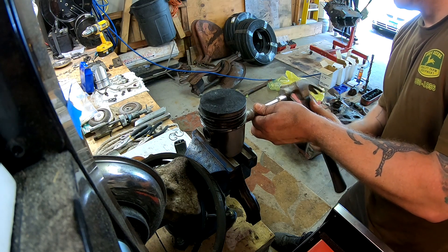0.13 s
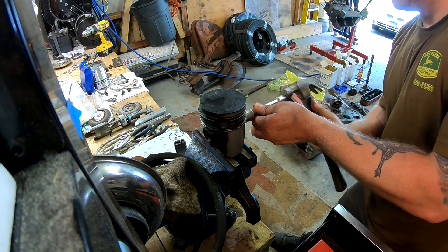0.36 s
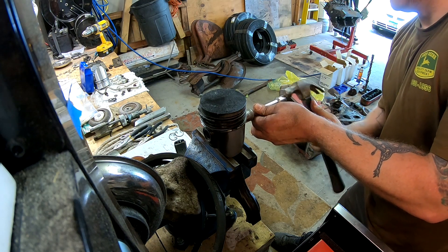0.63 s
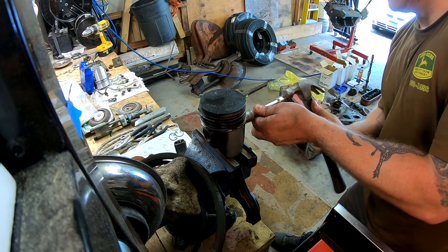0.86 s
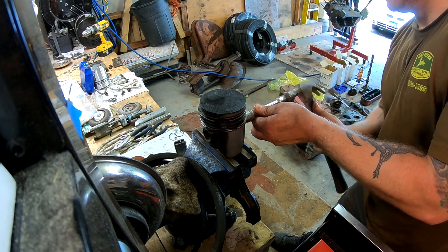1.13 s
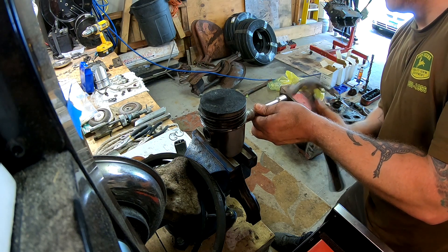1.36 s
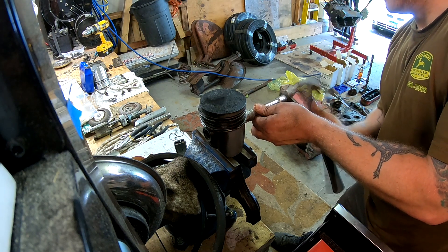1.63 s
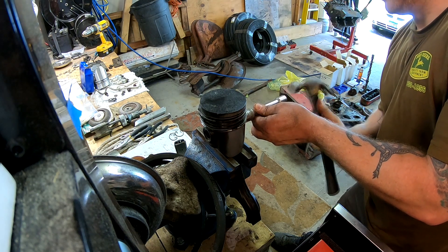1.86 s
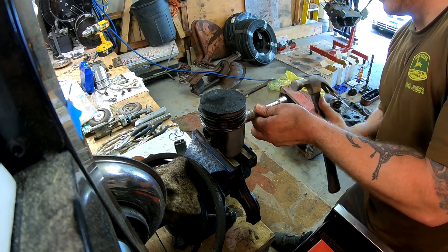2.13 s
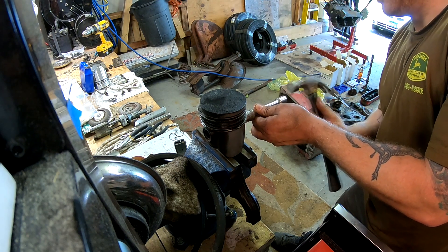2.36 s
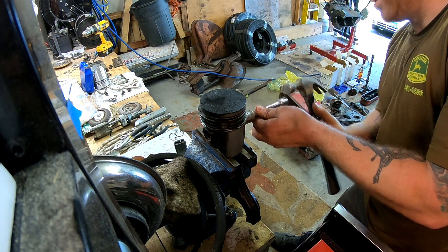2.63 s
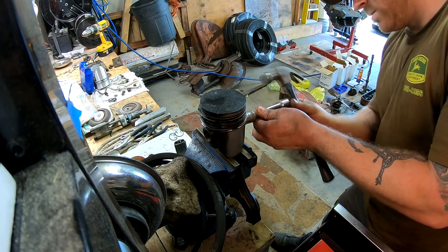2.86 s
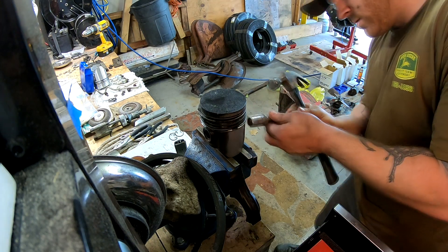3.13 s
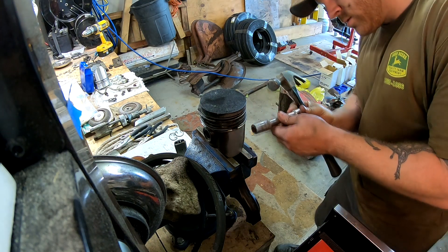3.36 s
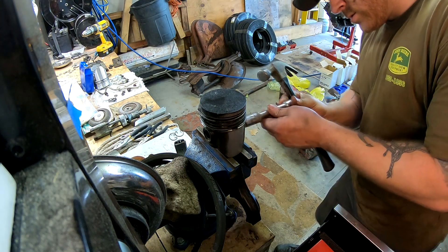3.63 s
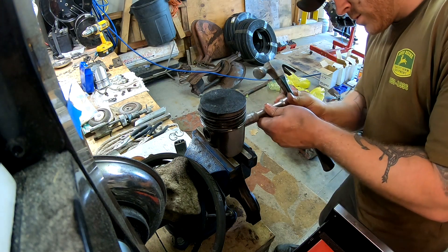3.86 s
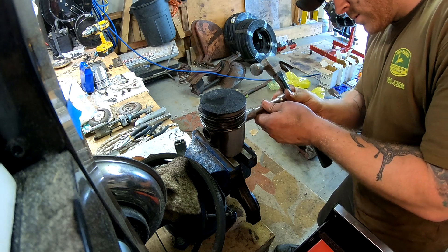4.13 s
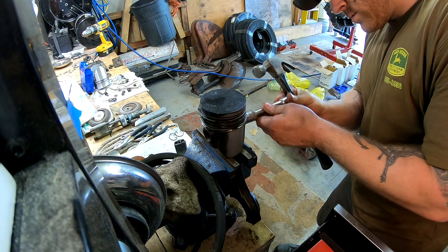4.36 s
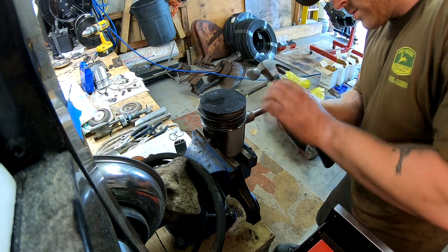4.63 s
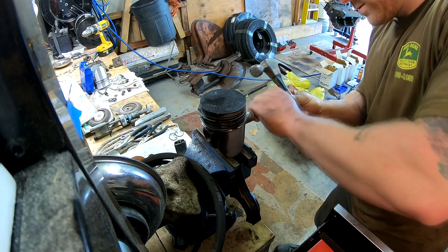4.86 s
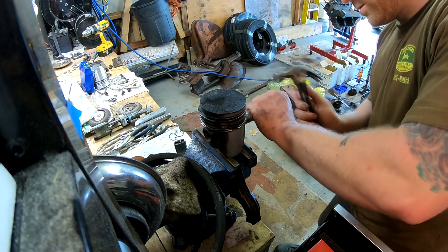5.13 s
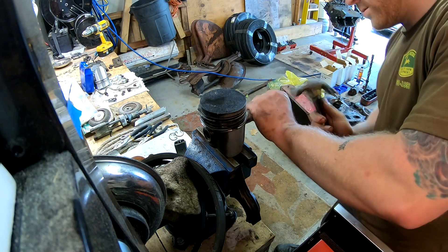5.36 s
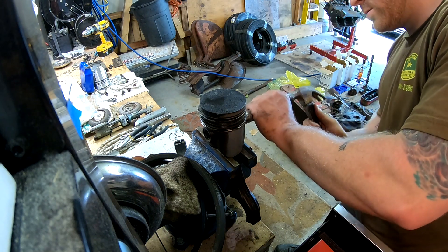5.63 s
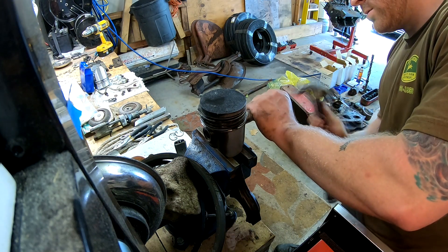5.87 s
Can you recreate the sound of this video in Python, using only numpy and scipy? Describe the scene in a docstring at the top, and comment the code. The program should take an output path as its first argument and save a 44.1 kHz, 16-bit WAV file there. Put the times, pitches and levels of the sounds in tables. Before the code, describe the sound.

Close in a cluttered workshop, a hammer strikes a steel socket against a pin held in a vise. Nine hard, even cracks come about four a second, each with a bench thud and short metallic rattle. Then hands shift the tools with faint ticks, hollow knocks and low bumps, before two final loud blows. A soft steady hiss stays underneath; the microphone is very near.

```python
"""A hammer taps a steel socket against a pin in a bench vise, heard close by in a cluttered workshop. A steady
noise hiss lasts throughout. One blow falls just before the start and nine more by 2.2 s: each is a jolt through
steel resonances, a modal thud of bench and loose metal, and a decaying noise wash from the shop. The tone soon
turns dull and narrow, while two bands flutter faintly ahead of the blows; from 2.6 to 4.4 s hands shift the
tools with ticks, hollow knocks and low bumps; the tone grows bright and wide again before two last blows at 5.5
and 5.9 s."""
import sys
import numpy as np
from scipy import signal
from scipy.fft import rfft, irfft, next_fast_len
from scipy.io import wavfile
from scipy.ndimage import map_coordinates

SR = 44100
rng = np.random.default_rng(int(sys.argv[2]) if len(sys.argv) > 2 else 0)


def gain_from_decibels(decibels):
    """Convert decibel values to linear amplitude factors."""
    exponent = np.asarray(decibels, float) / 20
    return 10 ** exponent


def to_wav(s):
    """Save 16-bit WAV."""
    ch = np.atleast_2d(s).T  # columns
    pcm = np.round(np.clip(ch, -1, 1) * 32767)  # PCM
    wavfile.write(sys.argv[1], SR, pcm.astype(np.int16))


N = 264600  # samples, 6 s


def unit(x):
    """Normalization: scales a signal to rms 1."""
    return x / np.sqrt(np.mean(x ** 2) + 1e-20)


def along(points, hz):
    """Spectral envelope: interpolates (frequency, value) points on a logarithmic frequency axis."""
    f, v = np.transpose(points)
    return np.interp(np.log(hz + 1), np.log(f + 1), v)


def curve(rows):
    """Time envelope: one value per sample for each column after the time."""
    s, *columns = np.transpose(rows)
    return [np.interp(np.arange(N) / SR, s, c) for c in columns]


def filtered(x, response):
    """Linear filtering: the spectrum of x is multiplied by a complex frequency response."""
    n = x.shape[-1]
    m = next_fast_len(n + 8192)
    return irfft(rfft(x, m) * response(np.fft.rfftfreq(m, 1 / SR)), m)[..., :n]


def add(track, s, sound):
    """Superposition: adds a sound to the track at s seconds, trimming what lies outside."""
    at = round(s * SR)
    part, sound = track[..., max(at, 0):], sound[..., max(-at, 0):]
    n = min(part.shape[-1], sound.shape[-1])
    part[..., :n] += sound[..., :n]


def ringing(modes, scatter_db, attack, lag=0):
    """Modal decay: damped sines of randomly scattered strength, each setting in after lag cycles."""
    hz, db, t60 = np.transpose(modes)[:, :, None]
    t = np.maximum(np.arange(SR // 2) / SR - lag / hz, 0)
    level_db = db + scatter_db * rng.standard_normal(hz.shape) - 60 * t / t60
    size = gain_from_decibels(level_db) * (1 - np.exp(-t / attack))
    return np.sum(size * np.sin(2 * np.pi * hz * t), axis=0)


# colour of the hiss: (frequency [Hz], relative level [dB])
HISS_COLOUR = [(15, -40), (25, -19), (117, -7), (175, 3), (285, -1.5), (439, 0), (659, -7), (754, -4.5),
               (1160, -8), (3520, -8), (6380, -11), (8590, -30), (12500, -41.5), (16000, -67.5)]
# left-right likeness of the hiss: (frequency [Hz], correlation [-1 to 1])
HISS_LIKENESS = [(60, 0.49), (150, 0.025), (380, 0.61), (950, -0.13), (2380, 0.65), (5980, 0.077),
                 (15000, -0.36)]


def hiss():
    """Stationary coloured noise: every blow sinks it a little and it creeps back; mid and side."""
    t = np.arange(N) / SR
    rest_db, sink_db, return_s = -54.5, 2, 1.27

    def response(hz):
        # the angle between mid and side sets the left-right correlation
        turn = np.arccos(np.clip(along(HISS_LIKENESS, hz), -1, 1)) / 2
        return gain_from_decibels(along(HISS_COLOUR, hz)) * [np.cos(turn), np.sin(turn)]

    noise = filtered(rng.standard_normal((2, N)), response)
    sunk_db = sink_db * sum((t > s) * np.exp(-(t - s) / return_s) for s, *_ in BLOWS)
    return gain_from_decibels(rest_db - sunk_db) * unit(noise)


# low bumps as the bench is leaned on: (time [s], level before the rise and decay [dB])
BUMPS = [(2.565, -50.5), (2.705, -50), (2.951, -49), (3.539, -55), (3.768, -46), (4.162, -51), (5.016, -71),
         (5.349, -60)]


def leaning():
    """Amplitude-modulated low noise: bumps through the bench over a faint unsteady rumble; mid and side."""
    t = np.arange(N) / SR
    rumble_db, swing_db, swings_per_s = -67, 2, 13
    rise_s, t60_s = 0.011, 0.43
    low = filtered(rng.standard_normal((2, N)), lambda hz: (hz / 60) ** 2 / (1 + (hz / 70) ** 5))
    unsteady = map_coordinates(rng.standard_normal(100), [t * swings_per_s])
    envelope = gain_from_decibels(rumble_db + swing_db * unsteady)
    for s, db in BUMPS:
        since = np.maximum(t - s, 0)
        envelope = envelope + gain_from_decibels(db - 60 * since / t60_s) * (1 - np.exp(-since / rise_s))
    return envelope * gain_from_decibels([[0], [-6]]) * unit(low)


# colour of the shop wash: (frequency [Hz], relative level [dB])
WASH_COLOUR = [(150, 5), (300, 2), (500, -4), (700, -1.5), (1000, -5.5), (1700, -3.5), (2400, -6),
               (3500, -3), (5200, -4.5), (6800, -6.5), (8200, -20.5), (10500, -30.5), (13500, -35.5),
               (16200, -69)]
# decay of the shop: (frequency [Hz], t60 [s])
SHOP_DECAY = [(150, 0.42), (400, 0.43), (900, 0.37), (1800, 0.37), (3000, 0.29), (5000, 0.32), (7500, 0.3),
              (14000, 0.25)]
# width of the shop wash: (frequency [Hz], side against mid [dB])
WASH_SPREAD = [(60, -42), (150, -16.5), (380, -13.5), (950, -4), (2380, -4.5), (5980, 0.5), (15000, 3)]


def wash(treble_db, hold):
    """Diffuse noise wash: the level stays flat for a moment, then each frequency dies at its own speed as the
    shop rings out; mid and side."""
    hz, t, z = signal.stft(rng.standard_normal((2, SR // 2)), SR, nperseg=512)
    clutter_db = 3 * rng.standard_normal(len(hz))  # shelves of loose parts ring unevenly
    tilt_db = treble_db * np.clip(np.log2((hz + 1) / 1200), -1, 1)
    colour_db = along(WASH_COLOUR, hz) + tilt_db + clutter_db
    fall_db = -60 * (np.hypot(t, hold) - abs(hold)) / along(SHOP_DECAY, hz)[:, None]
    tail = signal.istft(z * gain_from_decibels(colour_db[:, None] + fall_db), SR, nperseg=512)[1]
    tail = tail * (1 - np.exp(-np.arange(tail.shape[1]) / SR / 0.0017))
    mid, side = tail / np.sqrt(np.mean(tail[0, :SR // 20] ** 2))  # mid has rms 1 over its first 50 ms
    return np.array([mid, filtered(side, lambda f: gain_from_decibels(along(WASH_SPREAD, f)))])


# loose metal on the bench: (frequency [Hz], level [dB], t60 [s])
LOOSE_METAL = [(457, -8.5, 0.45), (697, 2, 0.25), (977, 8.5, 0.065), (1386, 7, 0.059), (1777, 5, 0.15),
               (1980, -15, 0.1)]


def clang():
    """Sympathetic modes: loose metal rings when the bench is shaken."""
    return ringing(LOOSE_METAL, scatter_db=3, attack=0.0024)


# vise and bench top, alike in both ears: (frequency [Hz], level [dB], t60 [s])
BENCH_MODES = [(78.4, 3.5, 0.35), (91.5, 3.5, 0.26), (107.1, -4.5, 0.32), (126.2, -6.5, 0.39),
               (136.46, -11, 0.52), (167.1, -10.5, 0.34), (202.1, -2.5, 0.24), (227.4, 4, 0.091),
               (242.3, -14.5, 0.1), (299.2, -3.5, 0.11), (339.3, -9.5, 0.14)]
# sideways sway of the bench, opposite in the two ears: (frequency [Hz], level [dB], t60 [s])
SWAY_MODES = [(44, -10, 0.2), (45.8, 6, 0.17), (60, -7, 0.83), (114.9, 2, 0.38), (274, -14, 0.49),
              (300, -1, 0.43), (322, -7, 0.47), (344, -17.5, 0.94)]


def bench_thud():
    """Inertia of a heavy modal body: the bench takes time to swing; mid and side."""
    top = ringing(BENCH_MODES, scatter_db=1.5, attack=0.011, lag=0.86)
    sway = ringing(SWAY_MODES, scatter_db=1.5, attack=0.014, lag=0.4)
    return np.array([top, gain_from_decibels(-9) * sway])


# socket, extension and pin: (frequency [Hz], resonance width [Hz], relative level [dB])
STEEL_RESONANCES = [(743, 290, -3), (1470, 130, 10.5), (1993, 850, 8.5), (2897, 300, -25.5),
                    (3380, 990, 19), (4200, 160, -25), (4950, 1200, 14), (6400, 1125, 21), (6330, 190, -10),
                    (7250, 400, -23), (9520, 900, -40.5), (12200, 560, -24.5), (14200, 740, -43.5)]


def crack(t60, rattle_db):
    """Impact excitation: a jolt, its rebound and a rattle of the faces drive damped steel; peak 1."""
    t = np.arange(SR // 10) / SR - 0.004  # the jolt lies 4 ms into the sound
    # socket meets pin just after hammer meets extension
    rebound_s, rebound = 0.000602 * (1 + 0.31 * rng.standard_normal()), 0.55
    jolt = np.exp(-(t / 0.00003) ** 2) + rebound * np.exp(-((t - rebound_s) / 0.00004) ** 2)
    # the rattle swells into the jolt and dies away after it
    rattle = gain_from_decibels(rattle_db - 60 * np.maximum(t / t60, -t / 0.0046)) * rng.standard_normal(len(t))
    rattle = filtered(rattle, lambda f: 1 / (1 + (f / 8000) ** 2))  # softer than the jolt

    def steel(f):
        total = 0
        for k, (centre, width, db) in enumerate(STEEL_RESONANCES):
            damping = 1j * f * width
            total = total + (-1) ** k * gain_from_decibels(db) * damping / (centre ** 2 - f ** 2 + damping)
        return total

    sound = filtered(jolt + rattle, steel)
    return sound / np.max(np.abs(sound))


# width of the hammer crack: (frequency [Hz], side against mid [dB])
CRACK_SPREAD = [(1000, -12), (2500, -10), (4000, -13), (5500, -3), (7500, -9.5), (15000, -10)]


def wide_crack(rattle_db):
    """Phase quadrature: a second crack, turned a quarter cycle, widens the first; mid and side."""
    mid = crack(t60=0.035, rattle_db=rattle_db)
    side = crack(t60=0.025, rattle_db=rattle_db)
    return np.array([mid, filtered(side, lambda f: 1j * gain_from_decibels(along(CRACK_SPREAD, f)))])


# modes of a hollow knock: (multiple of its pitch, level [dB], t60 [s])
KNOCK_MODES = [(1.001, -1, 0.11), (1.27, -7, 0.054), (1.62, -14, .05), (2.05, -13, 0.037)]


def hollow_knock(hz):
    """Inharmonic modes: a few short partials at fixed multiples of the pitch."""
    return ringing(np.array(KNOCK_MODES) * [hz, 1, 1], scatter_db=1, attack=0.00028)


# contacts of the tools in the hands:
# (time [s], tick level [dB], knock level [dB], knock pitch [Hz], shop wash level [dB])
TOUCHES = [(2.5681, -58, -49.5, 920, -59), (2.969, -66, -70, 664, -57), (3.7214, -39, -46, 718, -58.5),
           (3.7895, -59, -63, 514, -72), (4.18, -51, -54, 550, -77), (4.3077, -39, -36, 704, -53.5),
           (4.397, -22.5, -36.5, 865, -44.5)]


def hands():
    """Light impact: each contact gives a steel tick, one hollow knock and a duller wash; mid and side."""
    out = np.zeros((2, N))
    for s, tick_db, knock_db, hz, wash_db in TOUCHES:
        add(out, s - 0.003, gain_from_decibels(tick_db + np.array([[0], [-9]])) * crack(t60=0.031, rattle_db=0))
        add(out[0], s, gain_from_decibels(knock_db) * hollow_knock(hz))
        add(out, s, gain_from_decibels(wash_db) * wash(treble_db=-3.5, hold=0.0064))
    return out


# hammer blows, the first struck just before the start:
# (time [s], crack level [dB], bench thud level [dB], shop wash level [dB], wash hold [s])
BLOWS = [(-.17, 1, -20.5, -28, 0.071), (0.0729, 1, -17, -31.5, 0.1), (0.3104, -2.5, -20, -32.5, 0.052),
         (0.5592, -4.5, -20, -29, 0.02), (0.8068, -3, -21, -31, 0.053), (1.0841, -1, -20, -28, 0.032),
         (1.3576, 3, -22.5, -27.5, 0.023), (1.612, -1, -18.5, -26.5, 0.035), (1.8832, 0, -23, -26, 0.0096),
         (2.177, -2.5, -25, -29, 0.033), (5.498, 4.5, -17, -35, 0.17), (5.8716, 3.5, -19.5, -31, 0.1)]


def hammer():
    """Impulse and response: a blow cracks steel, thuds the bench, shakes metal, fills the shop; mid and side."""
    out = np.zeros((2, N))
    answer_s = 0.003  # loose metal and shop answer this long after the bench
    for s, crack_db, thud_db, wash_db, hold in BLOWS:
        rattle_db = -11 - 1.2 * crack_db  # a harder blow is cleaner
        add(out, s - 0.0004, gain_from_decibels(crack_db) * wide_crack(rattle_db))
        add(out, s, gain_from_decibels(thud_db) * bench_thud())
        add(out[0], s + answer_s, gain_from_decibels(wash_db - 8) * clang())
        add(out, s + answer_s, gain_from_decibels(wash_db) * wash(treble_db=0, hold=hold))
    return out


def scene():
    """Superposition of all sources, turned from mid and side to left and right."""
    mid, side = hiss() + leaning() + hands() + hammer()
    return np.array([mid + side, mid - side])


# two wandering bands, heard best just before a blow:
# (time [s], lower centre [Hz], lower level [dB], upper centre [Hz], upper level [dB])
FLUTTER_BANDS = [(.2, 3540, -16, 5100, -10), (.56, 3470, -4.5, 4900, -3), (.81, 4290, 6.5, 5120, -4),
                 (1.09, 4200, 2, 4930, 5), (1.36, 4200, -4.5, 4840, -1), (1.62, 4150, 7, 5200, -3),
                 (1.89, 3860, 0.5, 5110, -2.5), (2.18, 3950, 7, 4570, 6), (2.55, 4100, -7, 4640, 0),
                 (3.0, 4100, 6, 4750, 5), (3.4, 4210, 7, 4710, 4), (3.6, 4120, -1, 4740, -8),
                 (3.75, 4100, -14.5, 4740, -18.5)]


def flutter(x, spacing, echo, ring):
    """Comb filtering: each band rings and sends ever fainter copies ahead, spacing seconds apart."""
    out, step = np.zeros(N), SR // 10
    lower_hz, lower_db, upper_hz, upper_db = curve(FLUTTER_BANDS)

    def ahead(f):
        advance = np.exp(2j * np.pi * f * spacing)
        return (1 - echo) * advance / (1 - echo * advance)

    def bell(f, hz, width_hz, db):
        return gain_from_decibels(db) * np.exp(-((f - hz) / width_hz) ** 2)

    def response(f, at):
        bands = bell(f, lower_hz[at], 139.6, lower_db[at]) + bell(f, upper_hz[at], 240, upper_db[at])
        bands = bands + bell(f, 1820, 330, lower_db[at] - 22)  # a weaker band at a fixed pitch
        if 2.25 < at / SR < 3.25:  # two thin steady lines
            bands = bands + bell(f, 3857, 29, 6.5) + bell(f, 5000, 29, 6.5)
        return (ring + ahead(f)) * bands

    for at in range(2 * step, round(FLUTTER_BANDS[-1][0] * SR), step):
        rung = filtered(x[at - 2 * step:at + 2 * step], lambda f: response(f, at))
        out[at - step:at + step] += np.hanning(2 * step) * rung[step:-step]  # neighbours cross-fade
    return out


# the dull tone against the bright one: (frequency [Hz], level [dB])
DULL_TONE = [(50, -12.5), (100, -10), (150, -1), (210, 3), (330, -5.5), (520, 3.5), (1100, 5.5),
             (1750, 3.5), (2300, -3), (3000, -10), (3600, -1.5), (5300, -4.5), (6300, -17.5), (8500, -12.5),
             (10500, -12.5), (13500, 9.5)]
# slow drift of the tone: (time [s], dull share [0 to 1], side gain below the top treble [dB])
TONE_DRIFT = [(0, 0.37, 1), (.4, 0.26, .5), (.8, 0.83, -9.5), (1.3, 0.94, -27.5), (2.4, 0.99, -36),
              (3.2, 0.84, -40), (3.5, 0.83, -39.5), (3.65, 0.72, -10.5), (4.3, 0.35, -1), (5, 0.05, 0.5),
              (6, 0, -0.5)]


def drifting_tone(dry):
    """Time-varying filtering: bright and wide drifts to dull and narrow and back; mid and side."""
    share, side_db = curve(TONE_DRIFT)
    share = np.clip(share, 0, 1)
    dull = filtered(dry, lambda hz: gain_from_decibels(along(DULL_TONE, hz)))
    left, right = (1 - share) * dry + share * dull
    mid, side = (left + right) / 2, (left - right) / 2
    treble = filtered(side, lambda hz: 1 / (1 + (11000 / (hz + 1)) ** 12))  # the top stays wide
    return mid, treble + gain_from_decibels(side_db) * (side - treble)


def top_cut(x):
    """Nothing passes above the cut-off."""
    return signal.sosfilt(signal.butter(12, 16820, fs=SR, output="sos"), x)


def record(dry):
    """Filtering and limiting: the tone drifts, bands flutter, and the loudest cracks touch the ceiling."""
    mid, side = drifting_tone(dry)
    mid = mid + flutter(mid, spacing=0.0096, echo=0.182, ring=0.85)
    clipped = np.clip([mid + side, mid - side], -1, 1)
    pair = filtered(clipped, lambda hz: 1 / (1 + (hz / 15800) ** 24))
    return top_cut(np.clip(pair, -1, 1))


dry = scene()
out = record(dry)
to_wav(out)
```